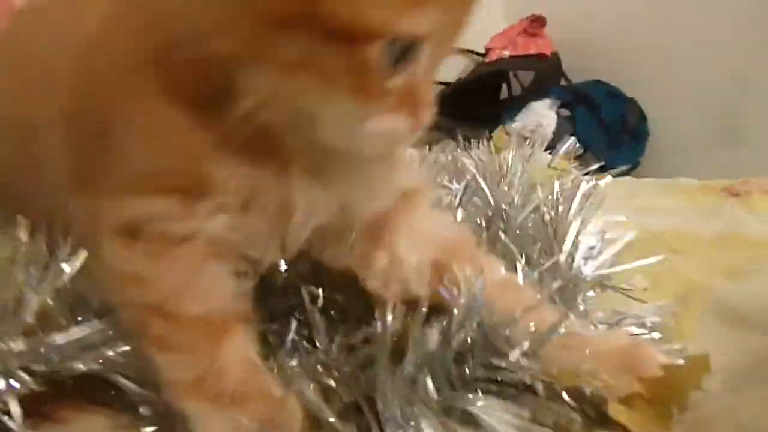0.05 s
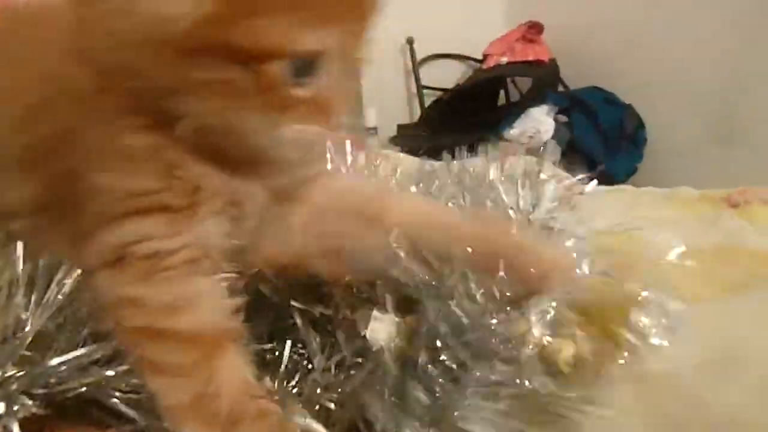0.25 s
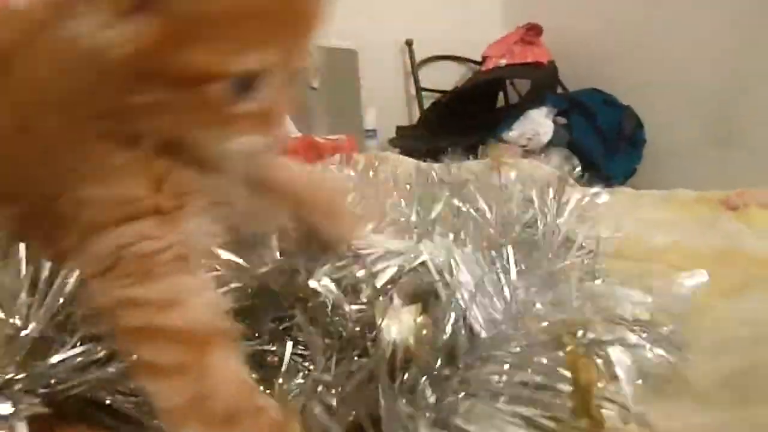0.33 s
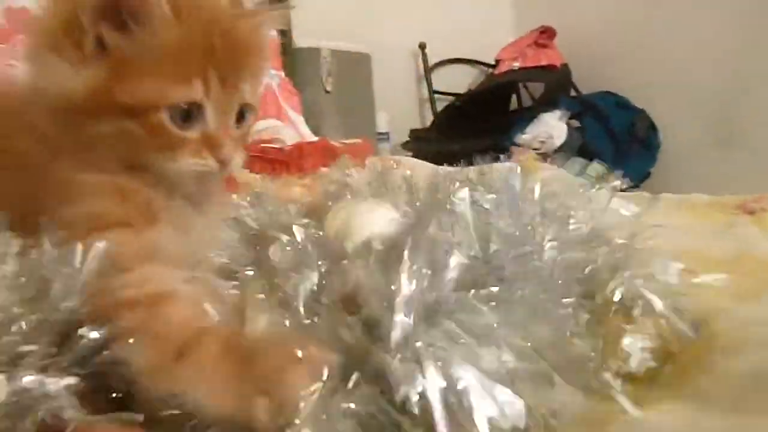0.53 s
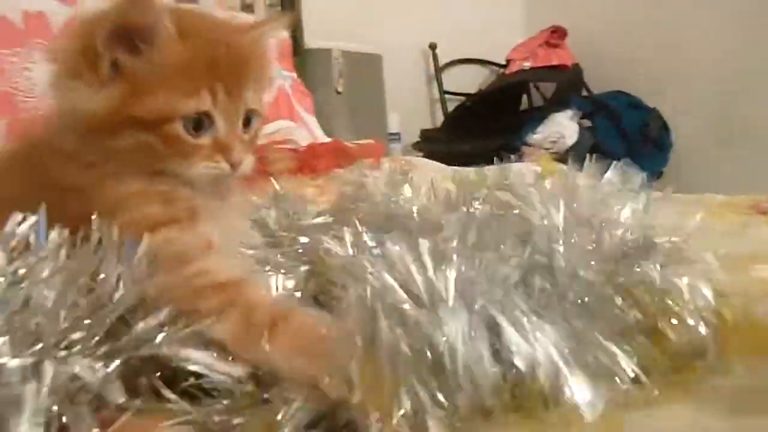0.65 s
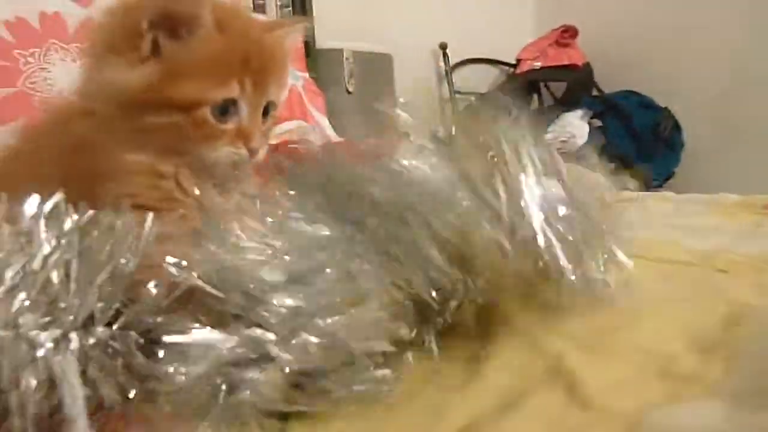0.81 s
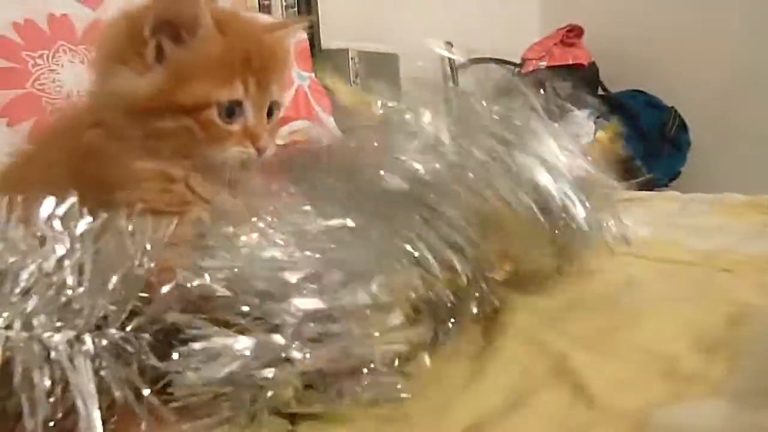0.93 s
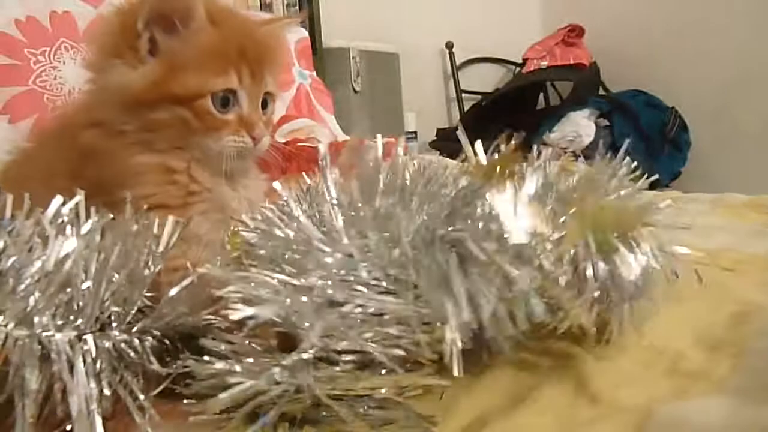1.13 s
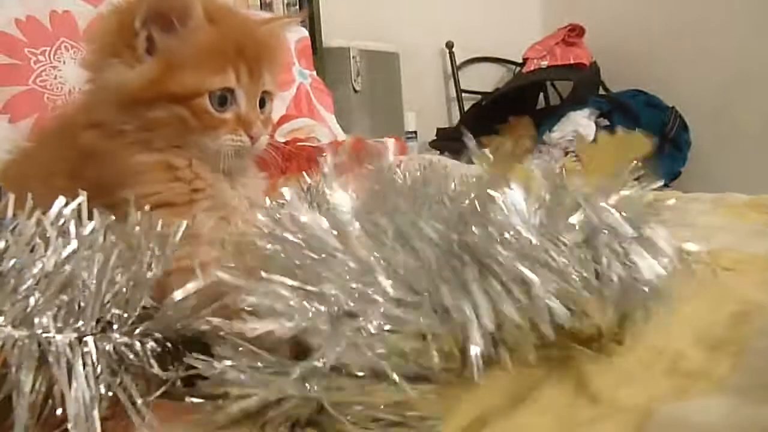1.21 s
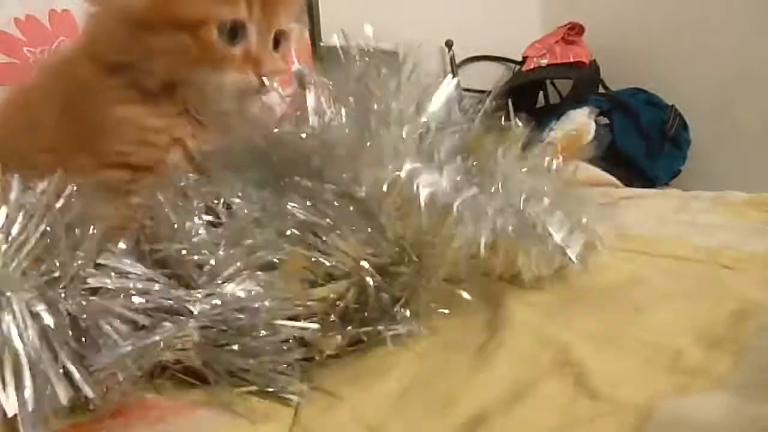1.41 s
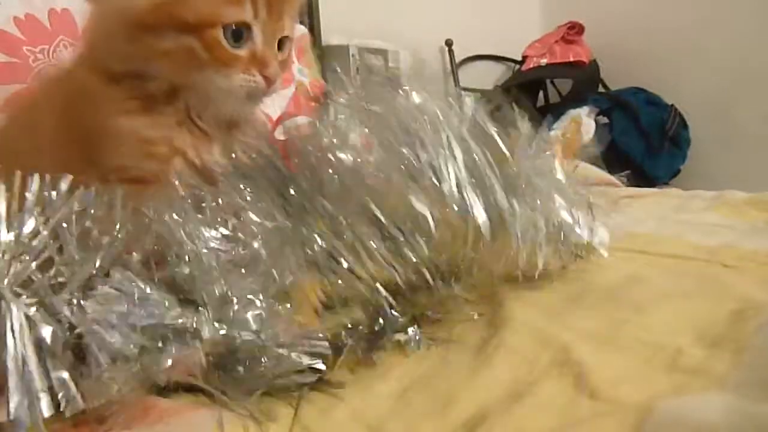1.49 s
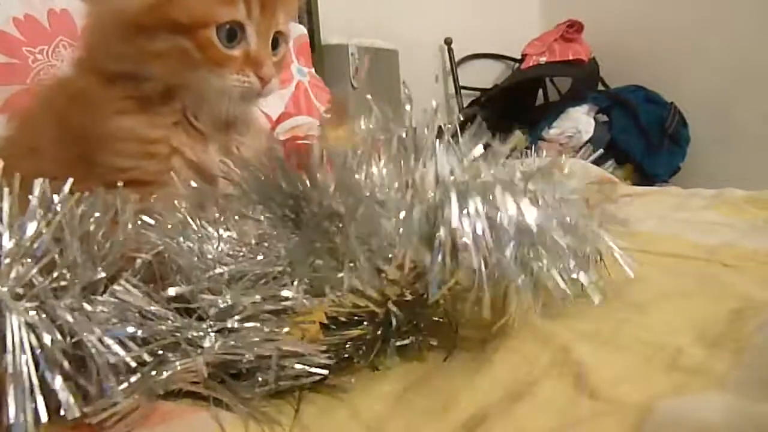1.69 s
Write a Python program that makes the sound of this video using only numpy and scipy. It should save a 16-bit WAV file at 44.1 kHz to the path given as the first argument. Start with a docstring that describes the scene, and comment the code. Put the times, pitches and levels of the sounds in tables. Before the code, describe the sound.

A tinsel garland rustles in uneven, bright swishes as a kitten paws at it on a bed. One sharp knock lands early, then stronger swishes follow with faint ticks and soft paw pats, close by in a small room.

```python
"""Swishes of tinsel: a garland is shaken and pawed at on a bed, close by, in a small furnished room.
Thousands of foil strips brush each other and the garland drags over the bedding.
Single strips tick, a few soft taps sound and paws pad on the mattress.
One sharp knock lands very near and the room answers it, over a low steady room noise."""
import sys
import numpy as np
from scipy import signal
from scipy.fft import rfft, irfft, next_fast_len
from scipy.io import wavfile
from scipy.ndimage import uniform_filter1d

SR = 44100
rng = np.random.default_rng(int(sys.argv[2]) if len(sys.argv) > 2 else 0)


def wrap_up_sound(samples):
    """Save the sound to the file named by the first command line argument, as 16-bit audio."""
    columns = np.atleast_2d(samples).T
    # keep every value between -1 and 1, then stretch to whole-number steps
    tamed = np.clip(columns, -1, 1)
    steps = np.round(tamed * 32767).astype(np.int16)
    wavfile.write(sys.argv[1], SR, steps)


N = 77175


def undb(db):
    """Decibels to gain."""
    return 10 ** (np.asarray(db) / 20)


def unit(x):
    """Scale to rms 1."""
    return x / np.sqrt(np.mean(x ** 2) + 1e-20)


def colour(x, points):
    """Minimum-phase filter through (f/Hz, level/dB) points."""
    size = next_fast_len(2 * N)
    hz, db = np.array(points).T
    f = np.maximum(np.fft.rfftfreq(size, 1 / SR), 1)
    gain = undb(np.interp(np.log(f), np.log(hz), db))
    cepstrum = irfft(np.log(gain), size)
    cepstrum[1:size // 2] *= 2
    cepstrum[size // 2 + 1:] = 0
    return irfft(rfft(x, size) * np.exp(rfft(cepstrum)), size)[:N]


def band(x, lo_hz, hi_hz):
    """Butterworth band-pass."""
    sos = signal.butter(2, [lo_hz, min(hi_hz, SR / 2 - 1000)], "band", fs=SR, output="sos")
    return signal.sosfilt(sos, x)


def wander(rate_hz):
    """Smooth random drift, rms 1."""
    hold = int(SR / rate_hz)
    steps = np.repeat(rng.standard_normal(N // hold + 1), hold)
    return unit(uniform_filter1d(steps, hold)[:N])


def contacts(per_s, spread_db):
    """Random clicks of uneven size; mean power is steady at any rate."""
    chance = np.clip(per_s / SR, 1e-4, 1)
    clicks = (rng.random(N) < chance) * rng.choice([-1, 1], N)
    sizes = undb(spread_db * rng.standard_normal(N))
    return unit(clicks * sizes / np.sqrt(chance))


def bursts(t, rows, decay_s, half_width_oct):
    """One decaying band of noise per (t/s, peak/dB, f/Hz) row."""
    out = np.zeros(N)
    ratio = 2 ** half_width_oct
    for at_s, peak_db, hz in rows:
        envelope = (t >= at_s) * np.exp(-np.abs(t - at_s) / decay_s)
        burst = band(rng.standard_normal(N) * envelope, hz / ratio, hz * ratio)
        out += undb(peak_db) * burst / np.abs(burst).max()
    return out


def stereo(mid, side):
    """Left and right from mid and side."""
    return np.array([mid + side, mid - side])


def foil_rustle(t):
    """Foil strips of many sizes brush together; harder shaking makes more and louder contacts."""
    # shaking strength: t/s, level/dB
    shake = [(0, -50), (.05, -61.5), (.125, -55), (.195, -46), (.25, -47), (.29, -47), (.385, -51),
             (.44, -44.5), (.48, -40), (.55, -46.5), (.59, -47), (.625, -40.5), (.68, -47), (.712, -36.5),
             (.76, -39), (.83, -42), (.895, -52), (1.01, -54.5), (1.09, -52.5), (1.15, -56), (1.24, -47.5),
             (1.27, -36.5), (1.375, -38), (1.415, -46.5), (1.455, -48), (1.487, -44), (1.54, -47.5),
             (1.59, -54.5), (1.675, -62), (1.72, -56.5), (1.75, -62.5)]
    # brushing foil spectrum: f/Hz, level/dB
    foil = [(150, -39), (450, -11), (900, -8.5), (1800, -9.5), (3000, -6), (4800, -4.5), (6500, -3.5),
            (8700, -4), (10500, -2), (12500, 1), (13700, -2.5), (14500, -3.5), (15500, -12.5)]
    full_per_s, full_db, rate_exponent = 26000, -37.5, .6
    flutter_hz, flutter_db, band_flutter_db = 44.97, 0.78, 0.52
    side_db = -22
    level_db = np.interp(t, *np.array(shake).T)
    power = undb(level_db - full_db) ** 2
    click_spectrum = rfft(contacts(full_per_s * power ** rate_exponent, spread_db=2.5))
    f = np.fft.rfftfreq(N, 1 / SR)
    edges_hz = np.r_[0, np.geomspace(1500, SR / 2, 8)]
    strips = np.zeros(N)
    for lo, hi in zip(edges_hz, edges_hz[1:]):
        in_band = irfft(click_spectrum * ((f >= lo) & (f < hi)), N)
        strips += in_band * undb(band_flutter_db * wander(flutter_hz))
    mid = unit(colour(strips, foil))
    side = undb(side_db) * unit(colour(rng.standard_normal(N), foil))
    return stereo(mid, side) * undb(level_db + flutter_db * wander(flutter_hz))


def bedding_drag(t):
    """A duller scrape swells and fades as the garland slides on the cloth."""
    # slides: centre t/s, half length/s, level/dB
    slides = [(0.166, 0.1, -53), (0.51, 0.12, -55), (.73, 0.064, -56.5), (1.341, 0.053, -48)]
    # scrape spectrum: f/Hz, level/dB
    scrape = [(150, -27), (500, 3), (1400, 1.5), (3200, -4), (5000, -16), (12000, -11.5)]
    swell = sum(undb(db) * np.exp(-((t - at_s) / half_s) ** 2 / 2) for at_s, half_s, db in slides)
    return swell * unit(colour(contacts(per_s=6000, spread_db=4), scrape))


def strip_ticks(t):
    """Single strips snap, bright and brief."""
    # snaps: t/s, peak/dB, f/Hz
    ticks = [(.008, -49, 10000), (0.1089, -35.5, 4060), (.1345, -33.5, 10000), (1.017, -37.5, 9000),
             (1.2245, -35, 8500), (1.6398, -38.5, 7000), (1.71, -40, 10500), (1.7214, -39.5, 6500)]
    return bursts(t, ticks, decay_s=0.0019, half_width_oct=1)


def soft_taps(t):
    """Light midrange contacts die within milliseconds."""
    # taps: t/s, peak/dB, f/Hz
    taps = [(.183, -42.5, 1775), (0.549, -36, 1970), (0.8706, -42, 1670), (1.67, -38, 1820)]
    return bursts(t, taps, decay_s=0.003, half_width_oct=0.53)


def paw_pads(t):
    """Paws land on the mattress with low thuds."""
    # paw contacts: t/s, peak/dB, f/Hz
    pads = [(.002, -45, 243), (1.507, -42.5, 263), (1.648, -47, 303)]
    return bursts(t, pads, decay_s=.018, half_width_oct=0.6)


def knock(t):
    """One hard, dry contact with a short low thump."""
    # contact response: f/Hz, gain/dB
    response = [(30, -38), (60, -27.5), (100, -13), (160, 0.5), (260, 1.5), (500, 5), (1500, 2.5),
                (1950, -1), (2800, 2.5), (5000, -6.5), (6500, -4), (9500, -10.5), (12000, -5.5),
                (15500, -24)]
    at_s, impulse_db, lag_hz = .2638, 8, 3470
    thump_hz, thump_drive_db, thump_t60_s = 146.6, -32, 0.058
    impulse = np.zeros(N)
    impulse[int(at_s * SR)] = undb(impulse_db)
    # all-pass: below lag_hz the knock arrives slightly late
    warped = np.tan(np.pi * lag_hz / SR)
    coeff = (warped - 1) / (warped + 1)
    crack = signal.lfilter([coeff, 1], [1, coeff], colour(impulse, response))
    age_s = np.maximum(t - at_s, 0)
    thump = undb(thump_drive_db - 60 * age_s / thump_t60_s) * np.sin(2 * np.pi * thump_hz * age_s)
    return crack - band(thump, lo_hz=89, hi_hz=1500)


def wall_echoes(t, source):
    """The walls return a dense, fast-dying train of reflections."""
    # wall response: f/Hz, gain/dB
    walls = [(100, 9), (600, -7), (2500, -0.5), (7000, -1.5), (14000, 2.5)]
    delay_s, t60_s, send_db = .0125, 0.23, -11.5
    tail = contacts(per_s=3600, spread_db=4) * (t > delay_s) * undb(-60 * t / t60_s)
    reflections = colour(tail / np.sqrt(np.sum(tail ** 2)), walls)
    return signal.fftconvolve(undb(send_db) * source, reflections)[:N]


def room_noise():
    """Low, steady room noise, nearly the same in both ears."""
    # noise spectrum: f/Hz, level/dB
    spectrum = [(20, -25), (60, -12.5), (100, -7.5), (165, -1.5), (250, -4), (360, -4.5), (480, -9.5),
                (750, -10), (1100, -13.5), (1650, -14.5), (2400, -21.5), (4500, -24.5), (15000, -25.5)]
    level_db, side_db = -50, -30.5
    mid, side = (unit(colour(rng.standard_normal(N), spectrum)) for _ in range(2))
    return undb(level_db) * stereo(mid, undb(side_db) * side)


def scene():
    """Garland, paws and knock straight ahead; only the knock echoes."""
    t = np.arange(N) / SR
    small_contacts = strip_ticks(t) + soft_taps(t) + paw_pads(t)
    garland = foil_rustle(t) + bedding_drag(t)
    hit = knock(t)
    return garland + small_contacts + hit + wall_echoes(t, hit) + room_noise()


def record(dry):
    """Steep low-pass on the top treble."""
    cutoff_hz = 15650
    lowpass = signal.firwin(801, cutoff_hz, window=("kaiser", 6), fs=SR)
    return signal.fftconvolve(dry, lowpass[None], mode="same")


dry = scene()
out = record(dry)
wrap_up_sound(out)
```